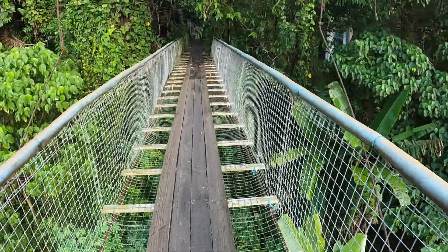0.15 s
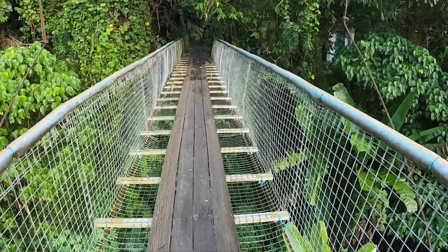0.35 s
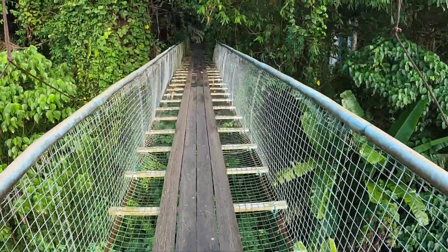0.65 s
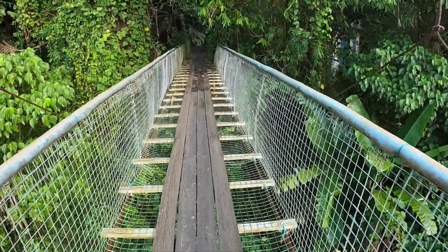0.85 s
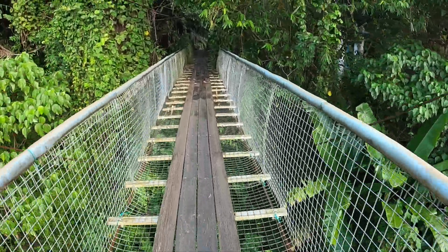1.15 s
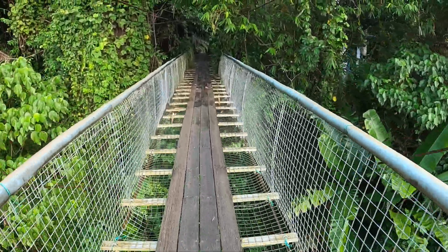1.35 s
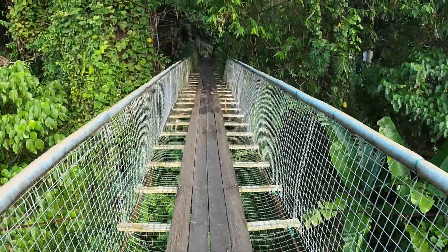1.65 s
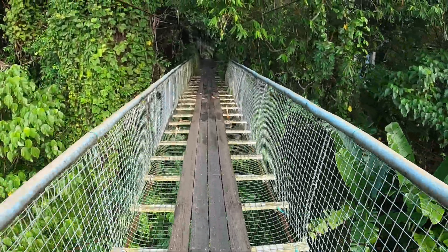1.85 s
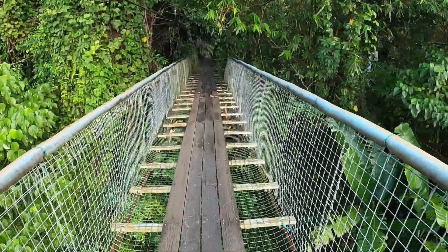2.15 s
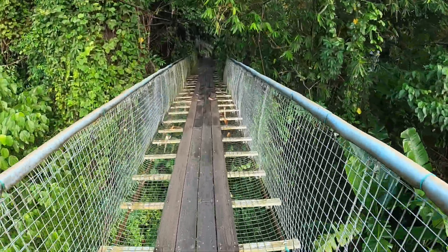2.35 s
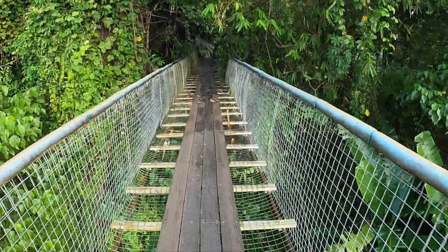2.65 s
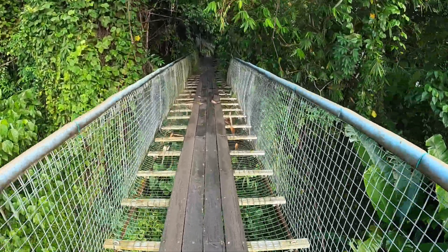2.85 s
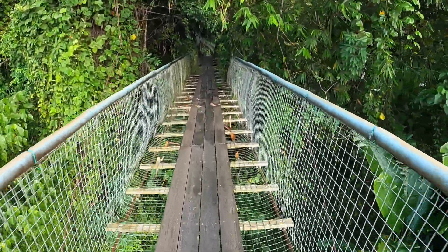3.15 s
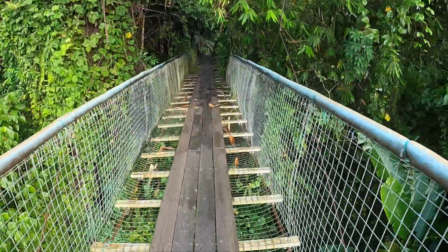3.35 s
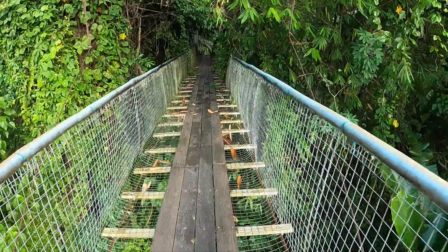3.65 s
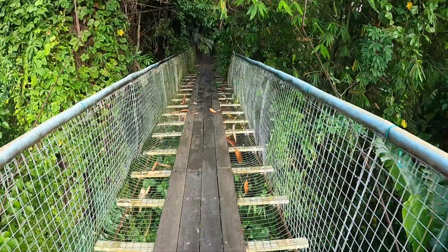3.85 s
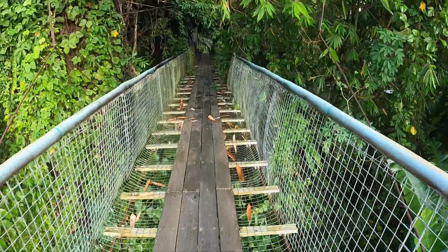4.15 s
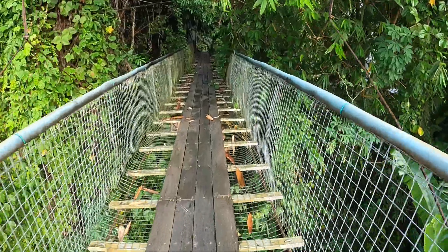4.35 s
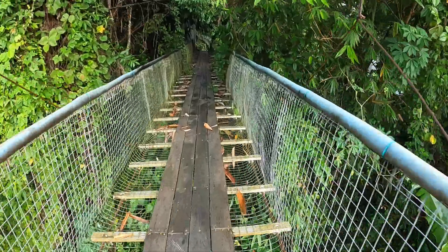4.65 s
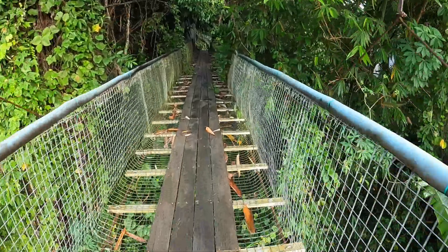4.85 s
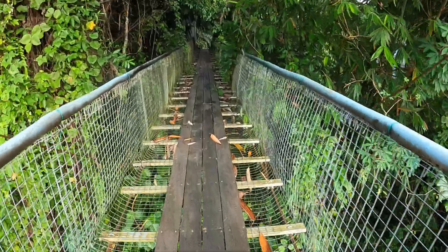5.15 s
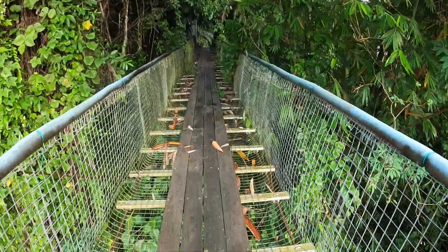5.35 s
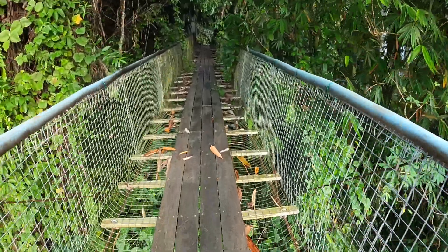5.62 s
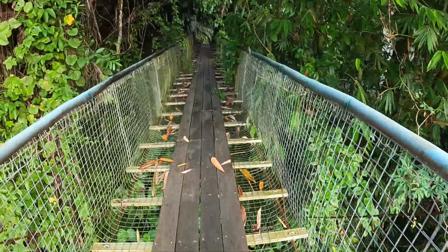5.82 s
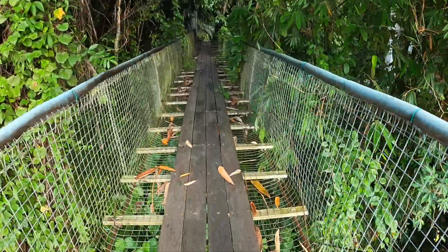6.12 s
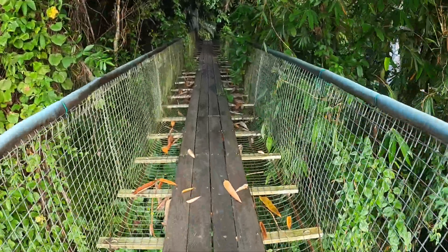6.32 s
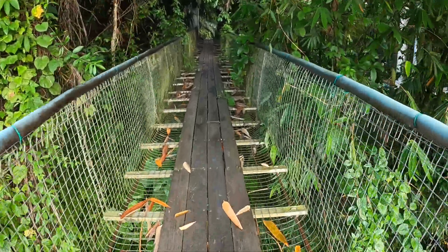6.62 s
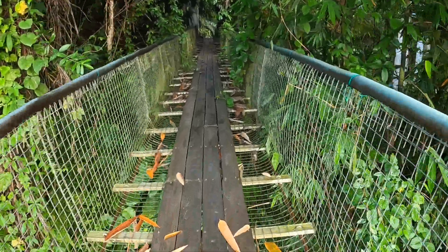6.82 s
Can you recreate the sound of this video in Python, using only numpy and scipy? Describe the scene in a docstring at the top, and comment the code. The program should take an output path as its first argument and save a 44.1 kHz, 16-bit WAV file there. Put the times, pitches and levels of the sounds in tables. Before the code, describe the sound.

A walker crosses a suspended wooden footbridge in forest, heard close in stereo. From 0 to 2 s the steps are faint: small dull knocks near 0, 0.5, 1.2 and 1.7 s, with cloth swishes on the left, low puffs of air, and short bending bird whistles, some blurred by echo among the trees. From 2.2 to 4 s the hollow knocks come in uneven clusters, slightly firmer, and the birds mostly fall quiet. At about 4.5 s one heavy blow booms and cracks on the planks with a sharp clack, then more knocks at 5.2 s and a soft narrow rasp until 5.7 s. A loose fitting chatters around 6.0 and 6.2 s; lighter knocks continue at 6.3 and 6.8 s as bird chirps return. Two steady high insect bands flutter throughout over a quiet forest wash and the span's murmur.

```python
"""Walking over a forest footbridge

Someone walks over the planks of a hanging footbridge: each blow is a contact click, dying sines and noise.
A loose fitting clacks in a few ringing tones, and the span murmurs and rasps in narrow coloured noise.
Shoes and clothes rustle as grainy noise, and low noise in puffs is air buffeting the microphone.
Birds are sines that bend in pitch, some direct and some echoed by the trees.
Behind them lie two bands of fluttering noise for the insects and a soft wash for the forest."""
import sys
import numpy as np
from scipy import signal
from scipy.fft import rfft, irfft
from scipy.io import wavfile

SR = 44100
rng = np.random.default_rng(int(sys.argv[2]) if len(sys.argv) > 2 else 0)


def dump_mix(stems):
    """Bounce the given channels to the path in sys.argv[1] as a 16-bit WAV at rate SR."""
    frames = np.atleast_2d(stems).T  # one column per channel
    limited = np.clip(frames, -1, 1)  # hard clip at full scale
    pcm = np.round(limited * 32767).astype(np.int16)
    wavfile.write(sys.argv[1], SR, pcm)


N = 307818  # length in samples, about 7 s
TIME = np.arange(N) / SR


def gain_of(db):
    """Turns decibels into amplitude."""
    return 10 ** (np.asarray(db) / 20)


def evened(x):
    """Scales a sound to rms 1."""
    return x / np.sqrt(np.mean(x ** 2) + 1e-20)


def read(points, hz):
    """Reads a table of values against pitch, with straight lines on a log-pitch axis."""
    table_hz, value = np.transpose(points)
    return np.interp(np.log(hz + 1), np.log(table_hz + 1), value)


def add(mix, start_s, sound):
    """Adds a sound into the mix at its start time, or at 0 if that is earlier."""
    part = mix[..., max(round(start_s * SR), 0):][..., :sound.shape[-1]]
    part += sound[..., :part.shape[-1]]


def sides(left_db):
    """Gains of the two channels that make the left louder than the right by left_db."""
    return gain_of([[left_db / 2], [-left_db / 2]])


def drift(rate_hz):
    """Random wander of rms 1, with little movement faster than rate_hz."""
    hz = np.fft.rfftfreq(N, 1 / SR)
    spectrum = rfft(rng.standard_normal(N)) / (1 + (hz / rate_hz) ** 4)
    return evened(irfft(spectrum, N))


def swells(rows, attack_s, release_s, rest_db):
    """Amplitude over time: each row rises, holds and dies away; powers add above a resting level."""
    power = np.full(N, gain_of(rest_db) ** 2)
    for start_s, length_s, level_db in rows:
        rise = np.clip((TIME - start_s) / attack_s, 0, 1)
        fall = np.exp(-np.clip((TIME - start_s - length_s) / release_s, 0, 20))
        power += (gain_of(level_db) * rise * fall) ** 2
    return np.sqrt(power)


# How alike the two channels are in spread-out sound: pitch_hz, coherence (1 same, 0 unrelated)
CHANNEL_LIKENESS = [(30, 0.45), (60, 0.15), (130, 0.82), (400, 0.92), (1400, 0.39), (3000, 0.32),
                    (4500, 0.39), (6800, 0.15), (9000, -0.13)]


def diffuse(colour, swell=1):
    """Coloured stereo noise of rms 1; shared noise makes the channels alike by a set amount at each pitch."""
    hz = np.fft.rfftfreq(N, 1 / SR)
    left, other = rfft(rng.standard_normal((2, N)) * swell)
    same = np.clip(read(CHANNEL_LIKENESS, hz), -1, 1)
    right = same * left + np.sqrt(1 - same ** 2) * other
    return evened(irfft(np.array([left, right]) * gain_of(read(colour, hz)), N))


def click(colour, size=2048):
    """A click of energy 1 and the given colour, with its energy as early as possible (minimum phase)."""
    hz = abs(np.fft.fftfreq(size, 1 / SR))
    log_gain = np.log(gain_of(read(colour, hz)))
    pulse = np.fft.ifft(np.exp(np.conj(signal.hilbert(log_gain)))).real
    return pulse / np.linalg.norm(pulse)


def tail(t60s, size=SR):
    """Noise whose pitches each die at their own speed, as many small echoes or modes do."""
    hz, t, grid = signal.stft(rng.standard_normal(size), SR, nperseg=256)
    fade = gain_of(-60 * t / read(t60s, hz)[:, None])
    return signal.istft(grid * fade, SR, nperseg=256)[1][:size]


def ring(modes, t, hold=1, spot_db=0., detune=0.):
    """A sum of dying sines; random shifts of level and pitch stand for the spot that is struck."""
    hz, db, t60 = np.transpose(modes)[..., None]
    weight, shift = rng.standard_normal((2, len(modes), 1))
    sign = (-1) ** np.arange(len(modes))[:, None]
    fade = gain_of(db + spot_db * weight - 60 * t / (t60 * hold))
    sines = np.sin(2 * np.pi * hz * (1 + detune * shift) * t)
    return (sign * fade * sines).sum(0)


def trees(x, t60, build_s=0.0023):
    """Trunks and leaves scatter a sound back: a dying noise echo, partly different on each side."""
    t60s = [(200, t60), (1500, 0.81 * t60), (4000, 0.56 * t60)]
    common, left, right = (tail(t60s) for _ in range(3))
    echo = (common + 0.27 * np.array([left, right])) * (1 - np.exp(-TIME[:SR] / build_s))
    return signal.fftconvolve(x[None], echo / np.linalg.norm(echo[0]), axes=1)[:, :N]


# Tones of the deck: pitch_hz, relative level_db, t60_s (time to fall 60 dB, before the hold factor)
DECK_TONES = [(81, -4.5, .37), (110.4, -4.5, 0.35), (140.3, 4.5, 0.41), (187, -1.5, .28), (249.4, 1, 0.3),
              (319, -19.5, 0.27), (403.4, -12.5, 0.38), (501, -15.5, 0.58), (542, -11.5, 0.26),
              (642, -11.5, 0.75), (711, -13.5, .45), (854, -27, .25), (945, -13, 0.36), (1009, -10, .3),
              (1080, -25, 0.29), (1248, -5.5, 0.22), (1420, -12, .25), (1580, -14, 0.26),
              (1820, -13.5, .22), (2400, -25, 0.31), (2680, -30, .22)]
# Colour of the many small tones between them: pitch_hz, relative level_db
CLATTER_COLOUR = [(50, -19.5), (110, 7), (260, 4.5), (500, -9), (800, -3.5), (1300, -6.5), (2000, -29),
                  (3300, -25.5), (5500, -45), (8000, -50.5), (14000, -66)]
# How long those small tones last: pitch_hz, t60_s (before the hold factor)
CLATTER_DECAY = [(100, 0.63), (600, 0.56), (1400, 0.53), (3000, 0.52), (9000, 0.9)]
# Colour of the first touch of sole on wood: pitch_hz, relative level_db
CONTACT_COLOUR = [(80, 9), (400, 12.5), (1000, 8), (2800, -4.5), (5500, -15.5), (8000, -22), (11000, -39),
                  (15000, -49)]


def unit(x):
    """Scales a blow to rms 1 over its first 20 ms."""
    early = np.arange(x.shape[-1]) / SR < .02
    return x / np.sqrt(np.mean(x[early] ** 2) + 1e-20)


def band(edge_hz, kind):
    """A filter that picks out one range of pitch."""
    return signal.butter(4, edge_hz, kind, fs=SR, output="sos")


def blow(knock_db, thud_db, crack_db, hold, low_hz, high_hz, settle_s, size=26000):
    """A shoe strikes wood: touch, tones and clatter, split into low thud, middle knock and high crack."""
    t, hold = np.arange(size) / SR, np.clip(hold, .15, 1.6)
    t60s = [(hz, t60 * hold) for hz, t60 in CLATTER_DECAY]
    clatter, spread = (unit(signal.fftconvolve(tail(t60s, size=size), click(CLATTER_COLOUR))[:size])
                       for _ in range(2))
    burst = rng.standard_normal(size) * np.exp(-t / 0.0026)
    contact = unit(signal.fftconvolve(burst, click(CONTACT_COLOUR))[:size])
    wood = unit(ring(DECK_TONES, t, hold, spot_db=3.5, detune=0.0055)) + clatter + contact

    low, mid, high = band(350, "low"), band((350, 1800), "band"), band(1800, "high")
    thud, knock, crack = (unit(signal.sosfilt(part, wood)) for part in (low, mid, high))
    # The bass comes in over about 1.5 ms; a sole that settles slowly blunts the rest
    low_tone = unit(ring([(low_hz, 0, .33)], t, hold))
    thud = unit((thud + low_tone) * (1 - np.exp(-t / 0.0015)))
    onset = 1 - np.exp(-t / max(settle_s, 1e-4))
    high_tone = unit(ring([(high_hz, 0, .08)], t, hold))
    knock = unit(onset * (knock + gain_of(0.5) * high_tone))
    # The upper tones radiate unevenly: extra clatter with opposite sign on each side
    apart = np.array([[1], [-1]]) * gain_of(-10) * onset
    knock = knock + 0.42 * apart * unit(signal.sosfilt(mid, spread))
    crack = unit(np.sqrt(onset) * crack) + apart * unit(signal.sosfilt(high, spread))
    crack = crack * sides(2.4)
    return gain_of(thud_db - 1) * thud + gain_of(knock_db - 9) * knock + gain_of(crack_db - 8) * crack


# Blows on the planks: start_s, knock_db, thud_db, crack_db (each before the fixed cut made in blow),
# hold (factor on ring time), low_hz and high_hz (two tones of the struck board)
PLANK_BLOWS = [(.012, -37.5, -45, -68, 0.87, 108, 691), (.48, -39.5, -47, -45, 1, 101, 1000),
               (1.18, -42, -45, -63, .74, 312, 1075), (1.646, -39.5, -39, -43, 0.94, 100.4, 1240),
               (1.699, -37, -37, -40.5, 0.68, 200, 1676), (1.729, -50, -42.5, -43, 0.99, 215, 1380),
               (1.832, -42, -47, -42.5, 0.78, 333, 1530), (2.204, -38, -38.5, -44, 0.78, 247.4, 1350),
               (2.214, -31.5, -37.5, -42.5, 0.65, 100, 850), (2.284, -32, -52, -44, 0.52, 194, 1310),
               (2.55, -51, -51.5, -59, 0.48, 364, 710), (2.792, -32, -36.5, -38, 0.68, 216, 1366),
               (2.803, -37, -30, -38.5, 0.51, 134, 1280), (2.861, -42, -36.5, -45, 0.89, 117, 1270),
               (3.311, -39, -45, -47, 0.29, 160, 970), (3.354, -31, -49, -50, 0.62, 292, 570),
               (3.414, -36.5, -60, -54, .45, 189, 1004), (3.457, -34, -45, -46, .57, 292, 630),
               (3.474, -41, -43, -56, 1, 114, 740), (3.527, -28.5, -48, -43, 0.56, 314, 630),
               (3.599, -34.5, -61, -49, 0.48, 320, 670), (3.64, -38, -52.5, -69, 0.41, 280, 616),
               (3.974, -40, -50, -57, 0.74, 131, 795), (4.009, -34, -43, -50, 0.79, 170, 674),
               (4.04, -39, -42, -61, 0.68, 134, 660), (4.471, -41.5, -48, -41, 0.73, 363, 1610),
               (4.528, -13.5, -19, -17, 0.5, 120, 1008), (4.545, -19.5, -19, -51, 0.33, 136, 1270),
               (4.573, -25.5, -24.5, -33, 0.68, 138, 540), (4.603, -23.5, -48, -35.5, 0.45, 131, 605),
               (4.765, -41.5, -55, -62, 0.87, 275, 650), (5.144, -29.5, -33, -38.5, .41, 99, 626),
               (5.159, -23.5, -36, -36.5, 0.98, 216, 896), (5.191, -22, -25.5, -33.5, 0.48, 189, 638),
               (5.256, -26.5, -28.5, -33, 0.88, 112, 416), (5.338, -29.5, -38, -44, 0.79, 283, 1250),
               (5.658, -34, -40.5, -52, 0.45, 373, 1316), (5.702, -42, -36.5, -56, 0.53, 188, 964),
               (6.301, -34, -36.5, -47, 0.85, 191, 1240), (6.325, -31, -50, -45.5, 0.31, 159, 1190),
               (6.344, -34, -40, -49, 0.38, 161, 546), (6.49, -39, -33, -50, .5, 250, 1260),
               (6.823, -24.5, -37, -43.5, 0.73, 369, 1520), (6.881, -33, -37, -65, 0.62, 112, 640)]
SOFT_DB, SETTLE_S = -42, 0.0059  # knock column of a soft footfall, and its settling time at hold 1
SETTLE_HALVING_DB = 30  # this much more knock halves the settling time


def footsteps():
    """Heels and soles strike planks; a hard blow or a short-ringing board settles the sole sooner."""
    out = np.zeros((2, N))
    for start_s, knock_db, thud_db, crack_db, hold, low_hz, high_hz in PLANK_BLOWS:
        settle_s = SETTLE_S * hold * .5 ** ((knock_db - SOFT_DB) / SETTLE_HALVING_DB)
        add(out, start_s, blow(knock_db, thud_db, crack_db, hold, low_hz, high_hz, settle_s))
    return out


# Hard clacks: start_s, ring_db (gain on the tones), crack_db (gain on the click)
FITTING_CLACKS = [(0.176, -56, -21.5), (4.523, -25.5, -6), (5.954, -26.5, -16.5), (5.9573, -47, -18),
                  (5.972, -37, -19), (5.991, -36, -22), (6.011, -43, -36), (6.223, -45, -17.5),
                  (6.229, -49, -24)]
# Tones of the fitting: pitch_hz, relative level_db, t60_s (before the hold factor)
FITTING_TONES = [(1170, -7, 0.13), (1273, 2.5, 0.052), (1405, 4, 0.098), (1487, -5, 0.24),
                 (2400, -15, 0.12), (2820, -6.5, 0.094), (3370, -8.5, 0.1)]


def fitting():
    """A loose part of the bridge clacks and chatters: a click and short dying tones, louder on the left."""
    out, t = np.zeros(N), np.arange(SR // 3) / SR
    snap = click([(500, -4), (1400, 2), (3500, -6.5), (4500, -13), (9000, -33), (14000, -54)])
    for start_s, ring_db, crack_db in FITTING_CLACKS:
        add(out, start_s, gain_of(ring_db) * ring(FITTING_TONES, t, hold=0.46))
        add(out, start_s, gain_of(crack_db) * snap)
    return out * sides(3.4)


# A soft rasp as the span leans after the heaviest step: start_s, length_s, level_db
LEANING_RASPS = [(5.05, 0.64, -52)]
# Its narrow colour: pitch_hz, relative level_db
RASPING_COLOUR = [(1000, -31), (1400, -20), (1570, 5.5), (1680, -5.5), (1800, 5), (2000, -12), (2400, -15),
                  (4000, -55)]


def rasp():
    """Uneven rubbing, probably of the wire netting against its frame: narrow noise, mostly on the left."""
    rubbing = diffuse(RASPING_COLOUR, gain_of(2 * drift(60)))
    return rubbing * swells(LEANING_RASPS, attack_s=0.03, release_s=0.043, rest_db=-89) * sides(7.5)


# Swells as the walker's weight rolls over each foot: start_s, length_s, level_db
STRIDE_SWELLS = [(-.03, 0.24, -50.5), (.45, 0.38, -54.5), (1.08, 0.24, -51.5), (1.66, 0.26, -55.5),
                 (2.24, 0.41, -54), (2.84, 0.26, -54), (3.4, 0.35, -53), (3.92, 0.26, -55),
                 (4.3, 0.5, -59.5), (5.07, 0.51, -49), (5.62, 0.17, -53.5), (5.92, 0.078, -56),
                 (6.22, 0.23, -52.5), (6.82, .18, -54)]
# Colour of the murmur: pitch_hz, relative level_db
MURMUR_COLOUR = [(40, -17), (100, -20), (170, 10), (260, -0.5), (390, 4), (550, -8.5), (800, -11),
                 (1300, -0.5), (1800, -12.5), (2600, -73), (6000, -35.5)]


def span():
    """The swaying span murmurs: uneven noise with one swell for each stride."""
    murmur = diffuse(MURMUR_COLOUR, gain_of(2 * drift(21)))
    return murmur * swells(STRIDE_SWELLS, attack_s=0.037, release_s=0.15, rest_db=-73)


# Swishes of shoes and clothes as the legs swing: start_s, length_s, level_db
LEG_SWISHES = [(-.03, 0.13, -47.5), (.47, 0.19, -56.5), (.72, 0.3, -54.5), (1.13, 0.13, -49.5),
               (1.37, 0.18, -60.5), (1.81, 0.086, -48.5), (1.96, 0.22, -57.5), (2.27, 0.14, -46.5),
               (2.47, 0.1, -63), (2.79, 0.1, -52.5), (2.97, 0.39, -54), (3.43, 0.12, -47),
               (3.62, 0.12, -56.5), (3.95, .11, -53), (4.15, 0.097, -53), (4.3, .21, -54),
               (4.55, 0.17, -49), (5.05, 0.37, -51.5), (5.52, 0.12, -52), (5.73, 0.13, -52.5),
               (5.91, 0.081, -53.5), (6.19, 0.33, -53), (6.49, .09, -52.5), (6.6, 0.72, -54)]
# Colour of the rustle: pitch_hz, relative level_db
CLOTH_COLOUR = [(150, -18), (350, 11.5), (700, 0.5), (1500, 8.5), (2300, 6), (3400, 5), (5500, -1.5),
                (8000, -12), (9500, -17), (11000, -23), (14500, -41)]


def rustle():
    """Cloth and soles rub with each leg swing: noise with quick random grains, mostly on the left."""
    grains = gain_of(1.2 * drift(430) + 0.73 * drift(54))
    swing = swells(LEG_SWISHES, attack_s=0.026, release_s=0.062, rest_db=-61)
    return diffuse(CLOTH_COLOUR, grains) * swing * sides(7.4)


# Puffs of air on the microphone: start_s, length_s, level_db (before a 0.7 dB cut)
AIR_PUFFS = [(.02, 0.076, -30), (.3, 0.3, -37.5), (.47, 0.13, -31), (.8, 0.043, -41.5), (.96, 0.43, -47.5),
             (1.59, 0.22, -43.5), (1.93, .1, -48.5), (2.16, 0.79, -45), (3.14, 0.034, -39),
             (3.37, 0.23, -45.5), (3.76, 0.23, -45.5), (3.97, 0.083, -35.5), (4.33, 0.076, -40),
             (4.5, .07, -35), (4.62, .2, -53), (5.06, 0.15, -41.5), (5.39, 0.052, -51), (5.64, 0.13, -53),
             (6.21, 0.095, -45), (6.47, 0.15, -58), (6.8, 0.14, -51)]
# Colour of the buffeting: pitch_hz, relative level_db
AIR_COLOUR = [(10, -14), (22, 2), (38, 4.5), (60, -5), (100, -14.5), (160, -24), (300, -41), (900, -96)]


def air():
    """Air buffets the microphone: very low noise that swells in puffs."""
    puffs = swells(AIR_PUFFS, attack_s=0.02, release_s=0.045, rest_db=-65)
    return diffuse(AIR_COLOUR) * puffs * gain_of(-0.7) * sides(2.2)


# Moments when the walker is nearly still: middle_s
STILL_MOMENTS = [1.55, 2.14, 2.72, 3.84, 4.99, 6.13]


def stillness():
    """A gain that dips smoothly by 3 dB in each short pause between strides."""
    dips = sum(np.exp(-((TIME - middle_s) / 0.043) ** 2) for middle_s in STILL_MOMENTS)
    return gain_of(-3 * dips)


# Bird notes near and far: start_s, length_s, start_hz, middle_hz, end_hz, level_db (direct and echo
# together, before flutter), share (part of the power that arrives directly, 0 to 1)
BIRD_NOTES = [(.42, .07, 1180, 1120, 1180, -54, 0.6), (.52, 0.058, 1196, 1140, 1120, -47, 0.9),
              (0.645, 0.034, 1200, 1253, 1320, -54.5, 0.6), (.68, 0.1, 1404, 1520, 1630, -58, 0.2),
              (.785, .038, 1240, 1178, 1130, -62, .8), (0.817, 0.041, 1100, 1187, 1330, -42.5, 0.88),
              (.87, .08, 5900, 5370, 4830, -61, .05), (0.892, 0.18, 5560, 3990, 3140, -56.5, 0.45),
              (0.914, 0.066, 1757, 1430, 1200, -47, 0.83), (1.159, 0.087, 1220, 1124, 1260, -48.5, 0.7),
              (1.3, 0.065, 1755, 1340, 1170, -46.5, 0.81), (1.33, 0.092, 5900, 5400, 4800, -59, .05),
              (1.371, .15, 4730, 3650, 3070, -59.5, .35), (1.546, 0.092, 1230, 1181, 1373, -41.5, 0.8),
              (1.692, 0.048, 1815, 1536, 1340, -45, .8), (3.657, .095, 4580, 3840, 3040, -57, .35),
              (4.68, .05, 5900, 5440, 4800, -61, .05), (4.712, 0.14, 4730, 3660, 3230, -59, 0.54),
              (5.781, .07, 2410, 2630, 2730, -58, .05), (6.18, 0.055, 1160, 1173, 1200, -55, 0.8),
              (6.469, 0.083, 2690, 2570, 2350, -56.5, 0), (6.514, .082, 1216, 1162, 1340, -45, 0.86),
              (6.659, .043, 1810, 1578, 1250, -46, .6), (6.687, 0.041, 2490, 2640, 2750, -55.5, 0.3),
              (6.9, .1, 1168, 1160, 1300, -50, 0.77)]


def birds(waver=.014, far_waver=0.022, flutter_db=1.06, echo_s=0.68):
    """Sines bend through three pitches; a farther bird is more blurred in pitch and more of it is echo."""
    direct, scattered = np.zeros((2, N))
    unsteady, flutter = drift(132), gain_of(flutter_db * drift(60))
    for start_s, length_s, start_hz, middle_hz, end_hz, level_db, share in BIRD_NOTES:
        u = np.linspace(0, 1, round(length_s * SR))  # progress through the note
        share = np.clip(share, 0, 1)
        blur = (waver + far_waver * (1 - share)) * np.interp(start_s + u * length_s, TIME, unsteady)
        bend = np.polyfit([0, .5, 1], [start_hz, middle_hz, end_hz], 2)
        hz = np.polyval(bend, u) * (1 + blur)
        tone = np.sin(2 * np.pi * np.cumsum(hz) / SR)
        note = gain_of(level_db) * evened(tone * signal.windows.tukey(len(u), .5))
        add(direct, start_s, np.sqrt(share) * note)
        add(scattered, start_s, np.sqrt(1 - share) * note)
    return direct * flutter * sides(1.6) + trees(scattered * flutter, t60=echo_s)


# Colour of the lower insect band: pitch_hz, relative level_db
LOW_INSECTS = [(3500, -50), (3900, -15), (4150, -0.5), (4400, 4.5), (4650, 1.5), (4950, -7.5), (5400, -18),
               (6200, -29), (7000, -43)]
# Colour of the higher insect band: pitch_hz, relative level_db
HIGH_INSECTS = [(5500, -55), (6150, -14), (6430, -3), (6700, 2.5), (6860, -3.5), (6970, 0.5), (7220, -13.5),
                (7380, -8.5), (7650, -17.5), (8200, -52), (9000, -60)]


def insects():
    """Two far choruses of many callers: two bands of noise that swell a little and flutter."""
    low = diffuse(LOW_INSECTS) * gain_of(-51.5 + 0.49 * drift(1.24) + 1.08 * drift(70))
    high = diffuse(HIGH_INSECTS) * gain_of(-51.5 + .5 * drift(3.6) + 0.11 * drift(70))
    return low + high


# Colour of the far forest wash: pitch_hz, relative level_db
FOREST_COLOUR = [(20, 6), (70, -21), (160, 7), (380, -4.5), (650, -3), (1300, -9.5), (2000, 2),
                 (3500, -15.5), (6000, -21), (8000, -13.5), (9600, -13.5), (11000, -39), (15000, -33)]


def forest():
    """The far forest washes softly: broad noise whose level wanders."""
    return diffuse(FOREST_COLOUR) * gain_of(-61.5 + 1.8 * drift(6.1))


def scene():
    """Steps close by on the swaying span, birds among the trees, and the steady forest."""
    steps = footsteps() + fitting()
    bridge = steps + gain_of(-16) * trees(steps.mean(0), t60=0.9) + rasp()
    near_walker = (span() + rustle() + air()) * stillness()
    return bridge + near_walker + birds() + forest() + insects()


def record(dry):
    """The recorder's band limit: a steep filter removes the treble above about 15.1 kHz."""
    low_pass = signal.firwin(511, 15100, window=("kaiser", 9), fs=SR)
    return signal.oaconvolve(dry, low_pass[None], "same")


dry = scene()
out = record(dry)
dump_mix(out)
```